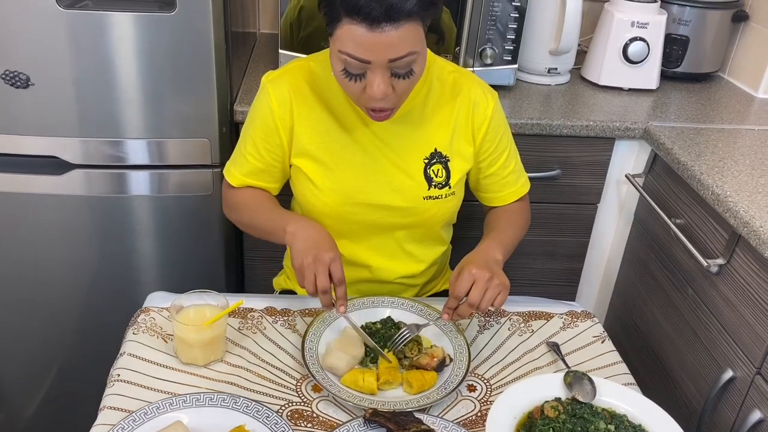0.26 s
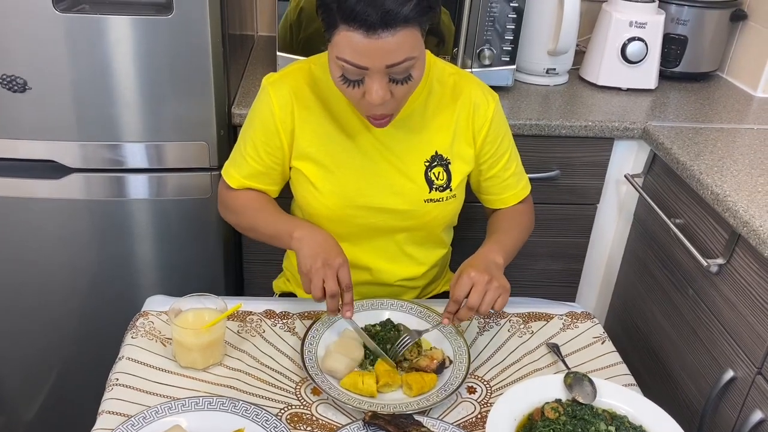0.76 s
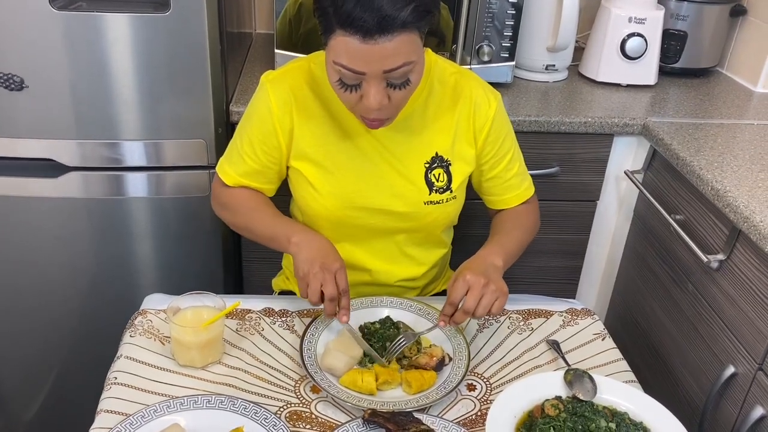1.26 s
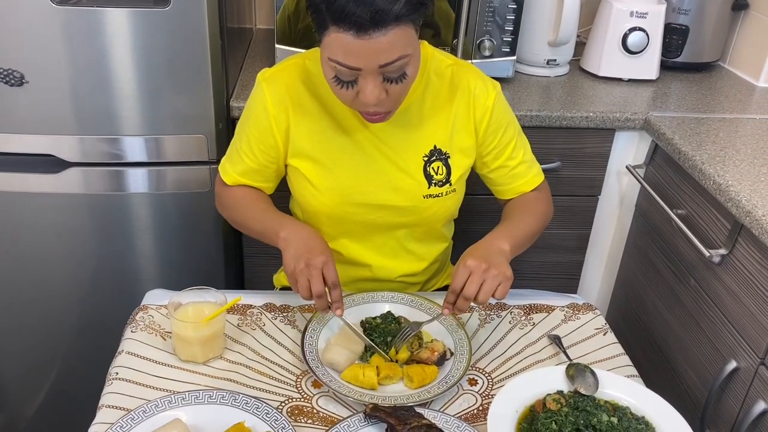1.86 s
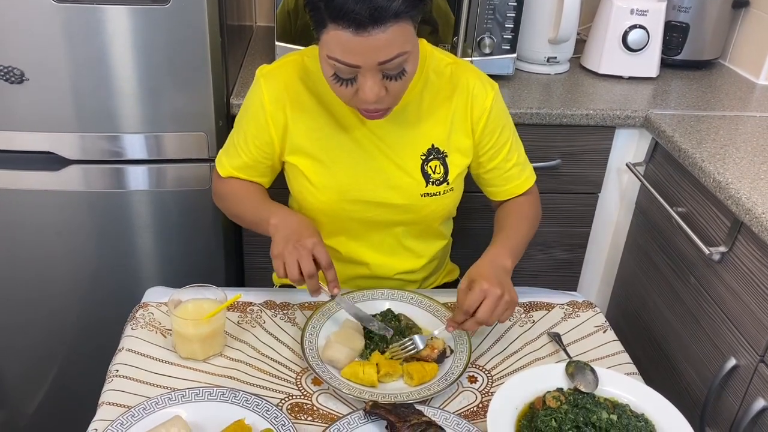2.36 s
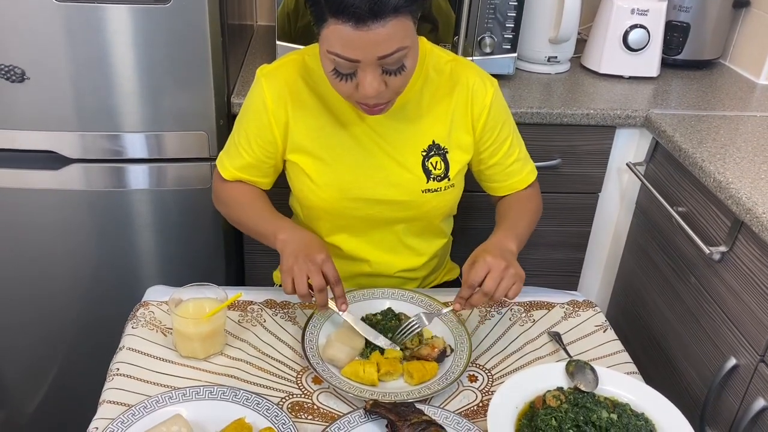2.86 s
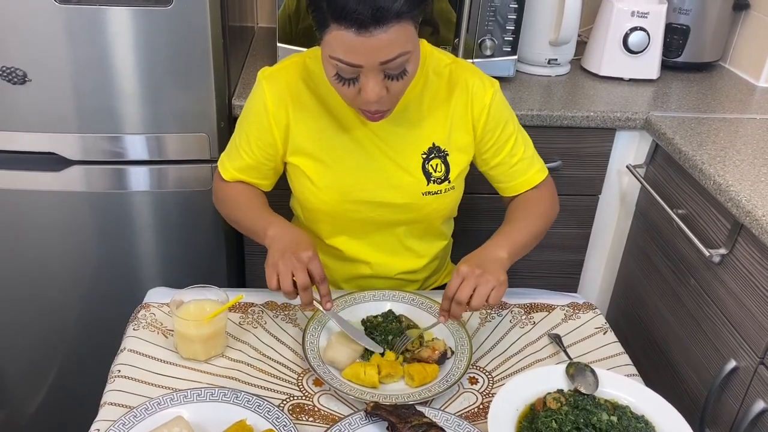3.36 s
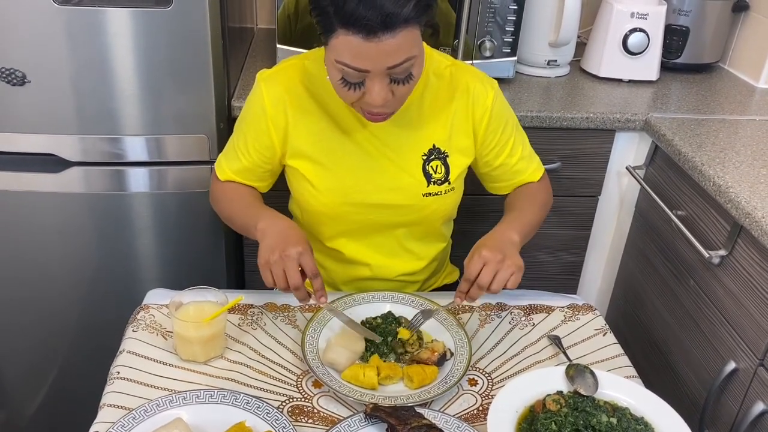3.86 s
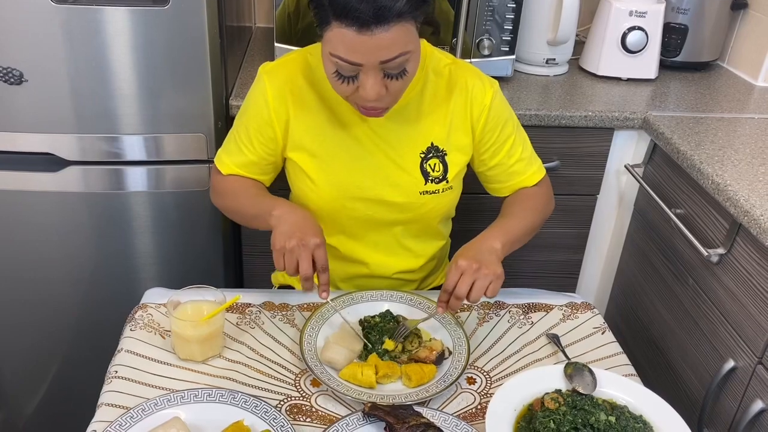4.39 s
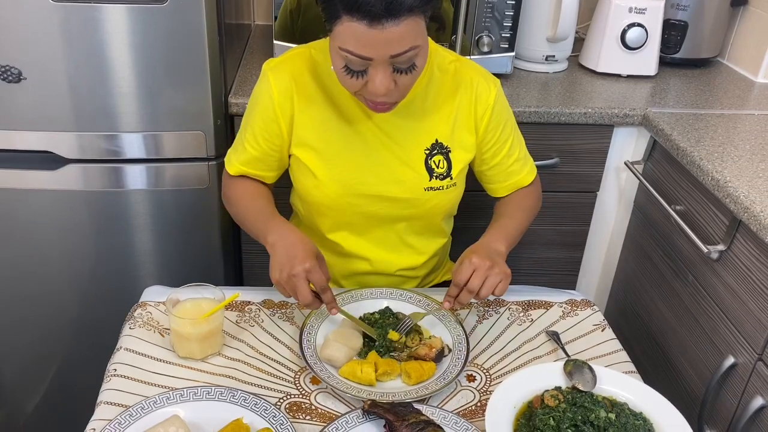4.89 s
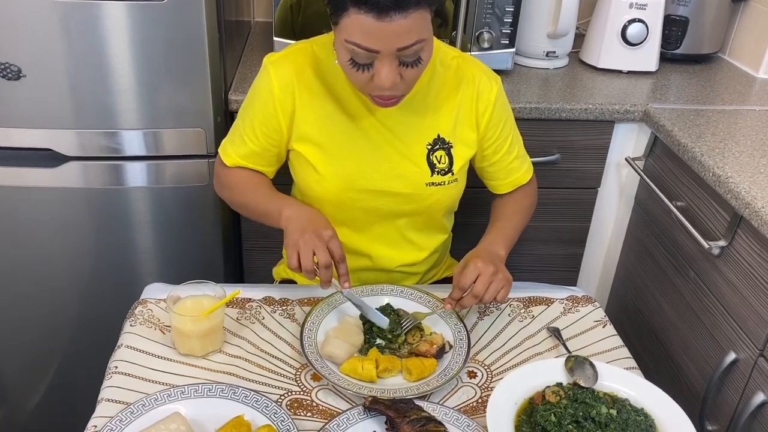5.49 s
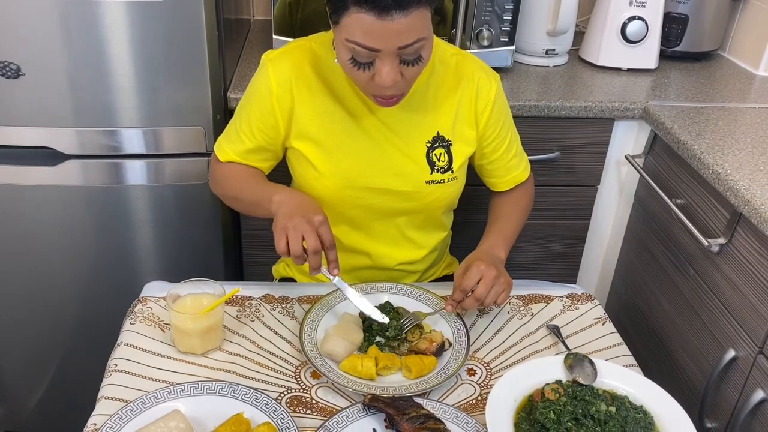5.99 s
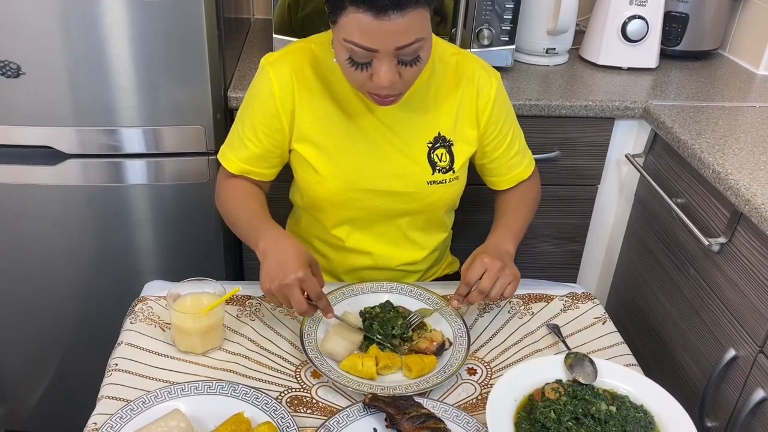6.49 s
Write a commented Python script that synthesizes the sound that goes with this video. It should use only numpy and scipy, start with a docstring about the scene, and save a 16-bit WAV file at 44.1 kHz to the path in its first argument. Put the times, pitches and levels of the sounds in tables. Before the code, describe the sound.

Someone cuts food with knife and fork on a ceramic plate. The sharpest clink comes early as a rapid chatter; softer, damped knocks come mid-way, followed by brief squeaky skids and delicate high ticks of steel on steel. Pauses between contacts leave only a low, whirring appliance hum with narrow drones. Stereo pickup at close range in a small kitchen, short bright reflections, no speech.

```python
"""A steel knife and fork work on a ceramic plate at a cloth-covered table in a small kitchen.
An appliance hums throughout: shaped noise with narrow drones. The blade first sings softly in wavering sines.
From 1.2 s the knife knocks on the plate in rings of decaying modes; fork ticks and more blade notes fall between.
From 4.4 s the edge skids in short squeaks: random slips ring the pressed plate under a wavering sine.
From 5.2 s the tines tick against the blade, and a last run of skids follows at 6.5 s; echoes trail the cutlery."""
import sys
import numpy as np
from scipy import signal
from scipy.fft import rfft, irfft
from scipy.io import wavfile
from scipy.ndimage import uniform_filter1d

SR = 44100
rng = np.random.default_rng(int(sys.argv[2]) if len(sys.argv) > 2 else 0)


def waveform_to_disk(signal):
    """Save audio, clipped to [-1, 1], as 16-bit WAV at the path in sys.argv[1]."""
    frames = np.transpose(np.atleast_2d(signal))
    scaled = np.clip(frames, -1, 1) * 32767
    samples = np.round(scaled).astype(np.int16)
    wavfile.write(sys.argv[1], SR, samples)


N = 297234
RING_TIME = np.arange(SR // 2) / SR  # half a second, in s

# modes of the plate with the blade pressed on it: pitch_hz, level_db (relative), t60_s
PRESSED_MODES = [(1358, 16, 0.026), (1308, 11.5, .038), (1560, 8, 0.023), (2178, 3, 0.034),
                 (2344, -5.5, 0.13), (2420, 9, .007), (3534, 0.5, 0.017), (3610, -1.5, 0.031),
                 (3940, -6, .014), (4500, -17, .025), (4990, -18, 0.036), (5600, -20, .018),
                 (5773, -16.5, 0.043), (6700, -10.5, 0.0055), (7550, -15, 0.0046), (9860, -21, 0.0069),
                 (11060, -19.5, 0.0046), (13000, -20, 0.0033)]

# grip and touching spot change from contact to contact: each mode shifts by up to 1.5 times this share
FREE_SHIFT, HELD_SHIFT = .002, .008


def from_db(db):
    """Decibels to gain."""
    return 10 ** (np.asarray(db) / 20)


def at_hz(points, hz):
    """Read a table on a log-frequency axis."""
    knots, values = np.transpose(points)
    return np.interp(np.log(np.maximum(hz, 1)), np.log(knots), values)


def add(track, s, sound):
    """Mix a sound into a track from time s on."""
    start = round(s * SR)
    track[start:start + len(sound)] += sound[:N - start]


def panned(x, pan_db):
    """Louder on the left by pan_db, one value or one for each frequency."""
    return irfft(rfft(x) * from_db(np.array([[.5], [-.5]]) * pan_db), N)


def unit_energy(sound):
    """Scale a sound to the energy of 10 ms at rms 1."""
    return sound / np.sqrt(np.sum(sound ** 2) * 100 / SR)


def wavering_sine(hz, waver, smooth_samples):
    """A sine whose pitch wanders with smoothed noise; waver is the rms share of the pitch."""
    unsteady = uniform_filter1d(rng.standard_normal(len(RING_TIME)), size=smooth_samples)
    pitch_hz = hz * (1 + waver * unsteady / unsteady.std())
    return np.sin(2 * np.pi * np.cumsum(pitch_hz) / SR)


def swell_and_ring(length_s, attack_s, t60_s):
    """Loudness of a rubbed tone: it builds while the edge slides, then rings out."""
    build = 1 - np.exp(-RING_TIME / attack_s)
    return build * from_db(-60 * np.maximum(RING_TIME - length_s, 0) / t60_s)


def hum():
    """Steady whir with narrow drones; each drone stands in the room with its own balance between the ears."""
    # the air in the kitchen: pitch_hz, level_db_per_hz
    air = [(12, -108), (30, -80.5), (56, -73), (110, -81.5), (250, -75.5), (450, -86), (680, -73),
           (1050, -77), (1600, -82.5), (3000, -90.5), (6500, -98.5), (10000, -102.5), (15500, -111)]
    # the air at the two ears: pitch_hz, likeness (the sum with the drones is held to -1 to 1)
    air_likeness = [(30, 0), (80, 1.8), (160, 0.9), (250, 2.5), (420, 2), (500, 0.95), (800, -0.37),
                    (1100, -0.5), (1700, -0.12), (2800, 0.5), (6000, .5)]
    # the air at the two ears: pitch_hz, left_over_right_db
    air_balance = [(60, 3.5), (420, -12), (680, -2), (1200, -2.5), (2200, 3.5), (4500, 4), (8000, -2)]
    # the appliance's drone, raised by the room:
    # pitch_hz, width_hz, level_db_per_hz, left_over_right_db, likeness (-1 to 1)
    drones = [(151.6, 12, -72.5, 5, 0.55), (178, 12.5, -76, -6, 0.61), (230, 13.6, -64, 4.5, 0.56),
              (248.7, 18.4, -66, -3.5, 0.94), (287.3, 19, -63, 3, 0.91), (309.2, 22.3, -63, 10, -0.47),
              (391.6, 14.8, -68, 8, 0.61), (519.2, 6.1, -65, 7.5, -0.7), (533, 24, -68.5, 4, -0.7),
              (761.3, 8, -70.5, -13, 1), (847, 16.4, -70, 6, 1), (911, 11.8, -68, 4, 0.59),
              (941.8, 8.9, -56.5, 7.5, -0.97), (960, 2.1, -55.5, 6, -0.65)]

    hz = np.arange(N // 2 + 1) * SR / N
    power = from_db(at_hz(air, hz)) ** 2
    # likeness and balance are averaged by power where air and drones overlap
    alike = power * at_hz(air_likeness, hz)
    pan_db = power * at_hz(air_balance, hz)
    for centre, width, db, balance_db, likeness in drones:
        peak = (from_db(db) / (1 + 2 * ((hz - centre) / width) ** 2)) ** 2
        power = power + peak
        alike = alike + peak * likeness
        pan_db = pan_db + peak * balance_db
    alike = np.clip(alike / power, -1, 1)
    pan = from_db(pan_db / power)

    mid, side = rfft(rng.standard_normal((2, N))) * np.sqrt([1 + alike, 1 - alike])
    ears = np.array([(mid + side) * pan, mid - side]) / np.sqrt(1 + pan ** 2)
    return irfft(ears * np.sqrt(power * SR / 2), N)


def evened(tail):
    """Diffuse echoes favour no single pitch: narrow peaks and dips are levelled to the broad trend."""
    spectrum = rfft(tail)
    power = np.abs(spectrum) ** 2
    narrow = uniform_filter1d(power, size=35)
    broad = uniform_filter1d(power, size=400)
    return irfft(spectrum * np.sqrt(np.abs(broad) / (np.abs(narrow) + 1e-9)), tail.shape[-1])


def kitchen(x, wet_db, likeness, gap_s=0.0064, build_s=0.0011, early_db=4, early_s=0.025):
    """Dense echoes from cupboards and walls after a short gap, the earliest lifted; the middle lasts longest."""
    # the kitchen's tail, before the early lift: pitch_hz, t60_s, level_db (relative)
    tail_bands = np.array([(300, 0.23, 15), (1350, 0.33, -3), (3500, 0.33, 2), (7000, .3, 1.5),
                           (14000, 0.23, 5.5)])
    t = RING_TIME
    likeness = np.clip(likeness, -1, 1)
    mid, side = rng.standard_normal((2, len(t))) * np.sqrt([[1 + likeness], [1 - likeness]])
    white = rfft([mid + side, mid - side])
    hz = np.arange(len(t) // 2 + 1) * SR / len(t)

    tail = 0
    edges_hz = np.geomspace(100, 18000, 9)
    for low, high in zip(edges_hz, edges_hz[1:]):
        band = irfft(white * (hz >= low) * (hz < high), len(t))
        centre_hz = np.sqrt(low * high)
        t60_s = at_hz(tail_bands[:, [0, 1]], centre_hz)
        db = at_hz(tail_bands[:, [0, 2]], centre_hz)
        tail = tail + band * from_db(db - 60 * t / t60_s)
    onset = np.clip((t - gap_s) / build_s, 0, 1)
    tail = tail * onset * from_db(early_db * np.exp(-(t / early_s) ** 2))
    tail = evened(tail) * (t > gap_s) * (t < .4)
    tail /= np.sqrt(np.sum(tail ** 2, axis=1, keepdims=True))
    return from_db(wet_db) * signal.fftconvolve(x[None], tail, axes=1)[:, :N]


def shifted(modes, share):
    """The same modes, each a little off its pitch."""
    hz, db, t60 = np.transpose(modes)
    return np.transpose([hz * (1 + share * rng.uniform(-1.5, 1.5, len(hz))), db, t60])


def strike(modes, pitch=1, tilt_db=0, shares_db=0, rise_s=0.00086):
    """Ring of a body after one tap: decaying sines of alternating sign; tilt_db is per octave."""
    ring = 0
    shares_db = shares_db + np.zeros(len(modes))
    for k, (hz, db, t60) in enumerate(modes):
        level_db = db + shares_db[k] + tilt_db * np.log2(hz) - 60 * RING_TIME / t60
        ring = ring + (-1) ** k * from_db(level_db) * np.sin(2 * np.pi * hz * pitch * RING_TIME)
    # the bending waves need a moment to spread
    return unit_energy(ring * (1 - np.exp(-RING_TIME / rise_s)))


def burst(sos, t60_s):
    """A dying puff of filtered noise."""
    decay = from_db(-60 * RING_TIME / t60_s) + 1e-18
    return unit_energy(signal.sosfilt(sos, rng.standard_normal(len(RING_TIME)) * decay))


def blade_notes(attack_s=.003, t60_s=0.047, waver=0.02):
    """Drawn lightly over the glaze, the blade sings a few close partials, each wavering on its own."""
    # the blade's notes: start_s, length_s, pitch_hz, level_db (before the partial's own level)
    notes = [(0.244, .008, 2750, -50), (1.493, .012, 2770, -52.5), (2.012, .014, 6330, -61),
             (3.36, 0.017, 4100, -30)]
    # each note is a cluster: ratio_to_pitch, level_db (relative)
    partials = [(0.967, -6), (1, 0), (1.025, -7), (1.105, -11)]
    out = np.zeros(N)
    for s, length, hz, db in notes:
        swell = swell_and_ring(length, attack_s, t60_s)
        for ratio, partial_db in partials:
            tone = wavering_sine(ratio * hz, waver, 120)
            add(out, s, from_db(db + partial_db) * swell * tone)
    return out


def skids(slips_per_s=2200, squeak_t60_s=0.014, waver=0.033, squeak_power=2.1):
    """Tiny slips of the edge shake the plate; when they lock to its lowest mode, it squeaks."""
    # the blade skids on the glaze, one row each time its edge slips: start_s, length_s, scrape_db,
    # force_rise_db (over the stroke), tilt_db_per_octave, squeak_hz, squeak_db (at full force)
    strokes = [(4.378, 0.0096, -46, 0, 5, 1350, -49), (4.5365, 0.014, -38.5, -7.5, 5.5, 1336, -47.5),
               (4.606, 0.0065, -33, -2, 3, 1376, -32.5), (4.6154, .004, -28.5, -6, 5, 1425, -28),
               (4.624, 0.014, -32.5, 1.5, 6, 1321, -28.5), (4.729, 0.0067, -39, -3, 7, 1448, -38.5),
               (4.7385, 0.0077, -42, 0.5, 9.5, 1396, -31.5), (6.481, .006, -36.5, 8, 8, 1400, -51),
               (6.491, 0.0092, -33.5, 0, 8, 1380, -39), (6.509, 0.02, -32.5, 1.5, 7, 1385, -39),
               (6.531, 0.0072, -26.5, -2.5, 5, 1370, -32)]
    out, t = np.zeros(N), RING_TIME
    for s, length, scrape_db, rise_db, tilt_db, squeak_hz, squeak_db in strokes:
        slid = np.minimum(t, length)
        force = from_db(rise_db * (slid / length - 1.0))  # ends the stroke at 1

        happens = rng.random(len(t)) < slips_per_s / SR
        slips = happens * rng.standard_normal(len(t)) * (t < length)
        slips[0] = 1  # the first slip breaks the edge loose
        ring = strike(shifted(PRESSED_MODES, HELD_SHIFT), tilt_db=tilt_db)
        scrape = signal.fftconvolve(slips * force, ring)[:len(t)]
        scrape /= np.sqrt(np.sum(scrape ** 2) / (length * SR))

        # the squeak grows faster with force than the scrape
        loudness = np.sqrt(2) * force ** squeak_power * swell_and_ring(length, .0015, squeak_t60_s)
        squeak = loudness * wavering_sine(squeak_hz, waver, 160)
        add(out, s, from_db(scrape_db) * scrape + from_db(squeak_db) * squeak)
    return out


def blade(focus_hz, focus_db=12, focus_octaves=0.34):
    """The spot where the blade is touched favours its modes around one frequency."""
    # the knife blade, damped by the hand: pitch_hz, level_db (relative), t60_s
    blade_modes = [(1900, -3, 0.029), (2087, 16, 0.017), (2630, 8, 0.014), (2960, 9, 0.021),
                   (3200, 2, 0.014), (3523, 5, 0.023), (3620, -2, 0.013), (3980, 4.5, 0.016),
                   (4340, -3, 0.022), (4640, -2, 0.024), (4760, 3, 0.022), (5800, -5, 0.012),
                   (5900, -2, 0.012), (7000, 3.5, .01), (7700, -2, 0.011), (8070, -7, 0.018)]
    octaves = np.log2(np.array(blade_modes)[:, 0] / focus_hz)
    favour_db = focus_db * np.exp(-(octaves / focus_octaves) ** 2)
    return strike(shifted(blade_modes, HELD_SHIFT), shares_db=favour_db)


def contacts(jar_db=-25, jar_damped_db=-2, tick_pressure=0.45, tick_blade_db=2):
    """Knocks and ticks as one list: a knock jars the fork, a tick passes through the blade to the plate."""
    # the knife knocks on the plate and chatters, one row a contact:
    # start_s, plate_db, pressure (0-1), blade_over_plate_db, blade_focus_hz
    knocks = [(1.247, -15.5, 0.01, -15, 3600), (1.2508, -12.5, 0.01, -21, 2300),
              (1.2527, -22, 0.1, -12, 2100), (1.2558, -34, 0.5, 0, 2050), (1.4662, -48, 0.8, -15, 3550),
              (3.3444, -28.5, 0.84, 2.5, 3880), (3.3577, -35, 1, 0, 4250), (3.3615, -39.5, 0.6, -3, 4300),
              (3.3728, -40, 1, -2, 4200), (4.148, -48, 0.6, 8, 3230), (4.1492, -31, 0.58, 3, 3330)]
    # the fork ticks against the blade: start_s, tines_db, blade_over_tines_db,
    # tines_tilt_db_per_octave, tines_pitch_ratio, blade_focus_hz
    fork_ticks = [(1.792, -53, -18, -19, 1.2, 7600), (3.669, -56.5, -5, 11, 0.91, 4000),
                  (5.216, -44, -7, -12, 0.88, 6000), (5.4211, -42, -11.5, -6, 0.83, 5800),
                  (5.7888, -46.5, -14, -5, 0.81, 5700), (6.256, -51, -3.5, -8, 1.012, 6400)]
    rows = []
    for s, db, pressure, blade_db, focus_hz in knocks:
        # the tines sound under the plate, less so when the knife is pressed down
        tines_db = db + jar_db + jar_damped_db * pressure
        rows.append((s, db, pressure, blade_db, focus_hz, tines_db, 0, 1))
    for s, db, passed_db, tilt_db, pitch, focus_hz in fork_ticks:
        plate_db = db + passed_db - tick_blade_db
        rows.append((s, plate_db, tick_pressure, tick_blade_db, focus_hz, db, tilt_db, pitch))
    return rows


def clinks(crack_db=0, crack_t60_s=0.03, crack_hz=4800, tine_spread_db=4):
    """Each contact rings plate, blade and tines in its own shares; returns the clanks and the thin ticks."""
    # the struck plate: pitch_hz, level_db (relative), t60_s
    plate_modes = [(370, -13, 0.064), (800, -10.5, .03), (920, -6, 0.029), (1217, 2, 0.046),
                   (1314, 4.5, 0.06), (1645, -8, 0.022), (2060, 7.5, .033), (2297, -1.5, 0.043),
                   (2396, 2, 0.028), (2660, 2.5, 0.024), (2860, -8, 0.04), (2920, -2, 0.021),
                   (3240, -4, 0.019), (3600, 0, .038), (3580, -20, 0.11), (3650, 0.5, 0.02),
                   (3990, 0, 0.022), (4840, -19, 0.018), (5320, -4, 0.019), (5630, -4, .065),
                   (6035, 5, 0.023), (6030, -21, 0.096), (6040, -4.5, 0.02), (6270, -8, 0.035),
                   (6700, -6, .02), (7340, -7.5, 0.015), (7700, -17, 0.039), (9830, -4, 0.027)]
    # the fork's tines, before each contact's pitch ratio: pitch_hz, level_db (relative), t60_s
    tine_modes = [(5760, -3, 0.032), (6350, -7, 0.016), (6870, 8, .015), (7140, 9.5, 0.029),
                  (8020, -0.5, 0.068), (9570, 8.5, 0.027), (10160, 15, .035), (11500, 3, .025),
                  (11950, 14, 0.023), (12370, 13, 0.032), (13900, -1, 0.023), (14700, 1, .02),
                  (15400, -11, 0.022)]
    click_db, click_band_hz, click_t60_s = -12.5, [1260, 5160], 0.039
    thud_db, thud_band_hz, thud_t60_s = -28.5, [85, 594], 0.052
    bright = signal.butter(2, crack_hz, "high", fs=SR, output="sos")
    dry_band = signal.butter(2, click_band_hz, "band", fs=SR, output="sos")
    low_band = signal.butter(2, thud_band_hz, "band", fs=SR, output="sos")

    clanks, ticks = np.zeros((2, N))
    for s, plate_db, pressure, blade_db, focus_hz, tines_db, tilt_db, pitch in contacts():
        pressure = np.clip(pressure, 0, 1)
        # a free plate thumps the table when struck
        thud = from_db(thud_db) * burst(low_band, thud_t60_s)
        free = strike(shifted(plate_modes, FREE_SHIFT)) + thud
        pressed = strike(shifted(PRESSED_MODES, HELD_SHIFT))
        # steel meets glaze with a dry click
        click = from_db(click_db) * burst(dry_band, click_t60_s)
        plate = np.sqrt(1 - pressure) * free + np.sqrt(pressure) * pressed + click
        add(clanks, s, from_db(plate_db) * (plate + from_db(blade_db) * blade(focus_hz)))

        # the serrated edge catches with a brief bright crack
        crack = from_db(crack_db) * burst(bright, crack_t60_s)
        shares_db = tine_spread_db * rng.standard_normal(len(tine_modes))
        tines = strike(tine_modes, pitch, tilt_db, shares_db)
        add(ticks, s, from_db(tines_db) * (tines + crack) / np.sqrt(2))
    return clanks, ticks


def scene():
    """Cutlery and plate a little left of centre, their echoes, and the hum."""
    # the place setting between the ears: pitch_hz, left_over_right_db
    plate_balance = [(1300, 2.5), (2300, 1.5), (3500, 4)]
    clanks, ticks = clinks()
    plate = clanks + skids() + blade_notes()
    plate_echoes = kitchen(plate, wet_db=-1.0, likeness=.3)
    tick_echoes = kitchen(ticks, wet_db=-0.5, likeness=0.9)
    balance_db = at_hz(plate_balance, np.arange(N // 2 + 1) * SR / N)
    direct = panned(plate + ticks, balance_db)
    return direct + panned(plate_echoes + tick_echoes, pan_db=2.5) + hum()


def record(dry, merge_hz=7200, port_lag_s=.000268, cutoff_hz=15800):
    """In the high treble both channels carry the left signal, the left later; peaks are rounded, the top cut."""
    hz = np.arange(N // 2 + 1) * SR / N
    spectrum = rfft(dry)
    share = np.clip((hz - merge_hz) / 1000 + .5, 0, 1)  # crossfade 1 kHz wide
    lag = np.exp(-2j * np.pi * hz * port_lag_s)
    shared = spectrum[0] * np.array([lag, np.ones(len(hz))])
    merged = irfft(spectrum * (1 - share) + shared * share, N)
    rounded = np.tanh(merged)
    return signal.sosfilt(signal.ellip(10, .1, 80, cutoff_hz, fs=SR, output="sos"), rounded)


dry = scene()
out = record(dry)
waveform_to_disk(out)
```